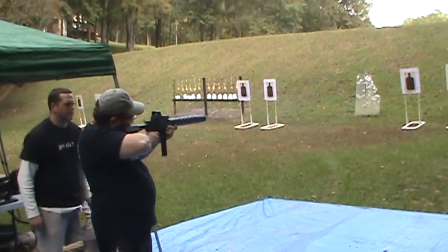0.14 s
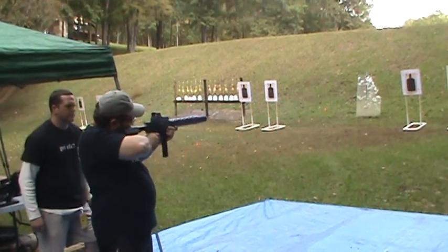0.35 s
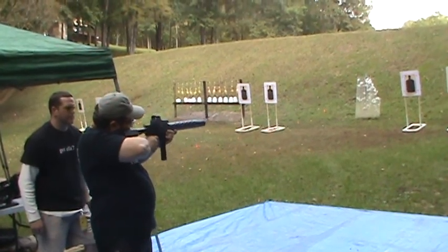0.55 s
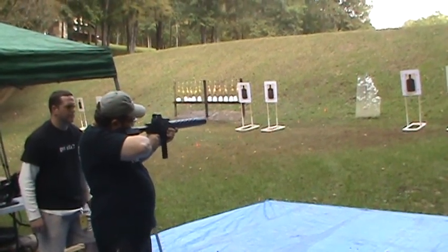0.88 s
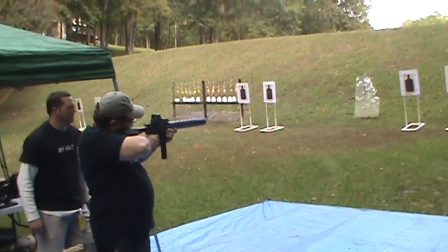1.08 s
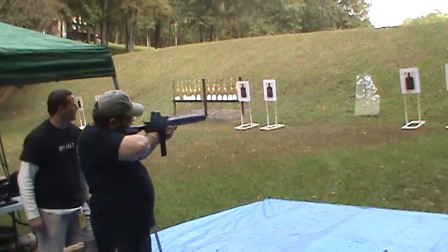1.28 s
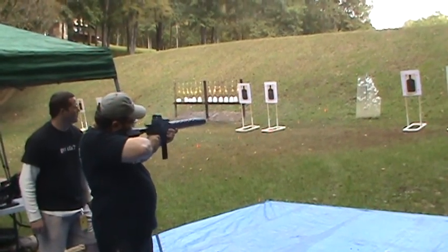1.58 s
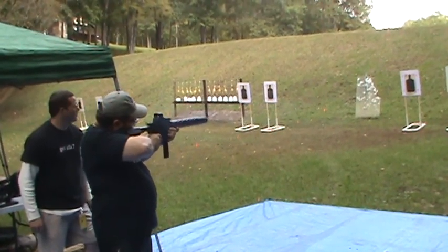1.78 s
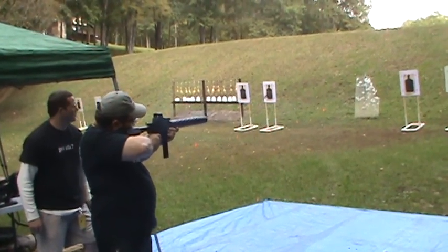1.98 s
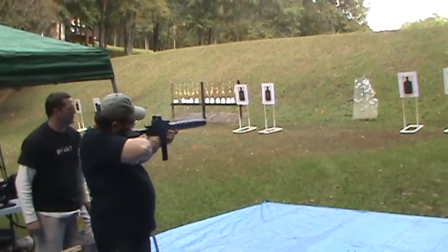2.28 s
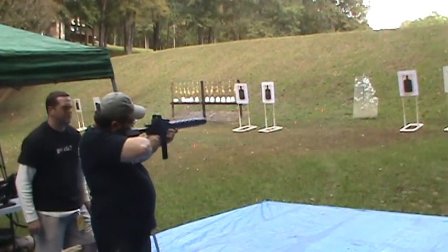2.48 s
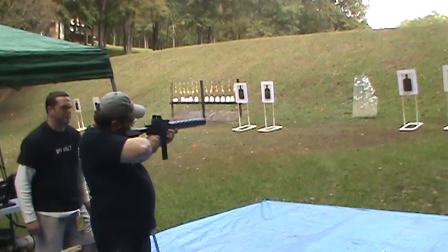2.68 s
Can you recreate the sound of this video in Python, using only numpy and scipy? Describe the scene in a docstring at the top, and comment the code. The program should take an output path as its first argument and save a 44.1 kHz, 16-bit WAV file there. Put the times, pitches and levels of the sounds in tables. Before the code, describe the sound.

A suppressed carbine fires four quick rounds, then three, then four more at an open outdoor range; bullets snap and thud downrange, echoes hiss from trees, and the close microphone's level is squashed flat.

```python
"""The fading hiss of an earlier round opens an outdoor range; a suppressed carbine fires a four-round burst.
Each round is a low damped muzzle thump, a noise puff of gas and a bolt clack; its crack scatters
back from the trees as a long hiss of tiny echoes, and bullets snap on a target and thud into the berm.
A three-round burst follows, then a quieter gun pops, knocks and vents a whistling jet of filtered noise.
A last four-round burst ends with spent cases landing; a fast limiter flattens the bursts throughout."""
import sys
import numpy as np
from scipy import signal
from scipy.fft import rfft, irfft
from scipy.io import wavfile

SR = 44100
rng = np.random.default_rng(int(sys.argv[2]) if len(sys.argv) > 2 else 0)


def wav_record(signal):
    """Record a signal, one row per channel, as 16-bit PCM in the file named by sys.argv[1]."""
    frames = np.transpose(np.atleast_2d(signal))
    bounded = np.clip(frames, -1, 1)
    # unit amplitude maps onto the largest positive 16-bit level
    quanta = np.round(bounded * 32767).astype(np.int16)
    wavfile.write(sys.argv[1], SR, quanta)


N = 125685
TIME = np.arange(N) / SR
# T60 is the time to fall 60 dB; all source levels are relative and lie ahead of the limiter.


def from_db(db):
    """Decibels to gain."""
    return 10 ** (np.asarray(db) / 20)


def rms_one(x):
    """Scale to unit rms."""
    return x / np.sqrt(np.mean(x ** 2) + 1e-20)


def at_hz(points, hz):
    """Read a table along log frequency."""
    points = np.array(points)
    return np.interp(np.log(hz), np.log(points[:, 0]), points[:, 1])


def filtered(x, order, hz, kind):
    """Butterworth filter of the given kind."""
    return signal.sosfilt(signal.butter(order, hz, kind, fs=SR, output="sos"), x)


def drift(rate_hz):
    """Smooth random wander of spread 1: noise through two equal low-pass poles, run at SR / 40."""
    step = 40
    pole = np.exp(-2 * np.pi * rate_hz * step / SR)
    slow = signal.lfilter([1], [1, -2 * pole, pole * pole], rng.standard_normal(N // step + 2002))
    slow = slow[2000:]  # drop the filter's start-up
    return np.interp(np.arange(N) / step, np.arange(len(slow)), rms_one(slow))


def blow(start, t60, rise=1e-4):
    """Envelope that swells from its start and dies away."""
    age = np.maximum(TIME - start, 0)
    return (1 - np.exp(-age / rise)) * np.exp(-np.log(1000) * age / t60)


def ring(start, hz, t60, rise=1e-4):
    """A damped pressure swing."""
    return blow(start, t60, rise) * np.sin(2 * np.pi * hz * (TIME - start))


def pan(db):
    """Left gain up and right gain down by the same decibels."""
    return from_db([[db], [-db]])


def stereo(mid, side, likeness):
    """Left and right from two unrelated signals; likeness is their correlation."""
    c = np.clip(likeness, 0, .999)
    return np.sqrt((1 + c) / 2) * mid + np.sqrt((1 - c) / 2) * side * np.array([[1], [-1]])


NEAR_LIKENESS = 0.94


def noise(colour, likeness=NEAR_LIKENESS):
    """Stereo noise of a given spectrum, rms 1."""
    hz = np.maximum(np.fft.rfftfreq(N, 1 / SR), 1)
    spectra = rfft(rng.standard_normal((2, N))) * from_db(at_hz(colour, hz))
    mid, side = irfft(spectra, N)
    return rms_one(stereo(mid, side, likeness))


TICK_LOW_HZ = 1370


def ticks(rows, t60, colour):
    """Short hard contacts as noise bursts, with no bass."""
    contacts = sum(from_db(db) * blow(s, t60) for s, db in rows) * noise(colour)
    return filtered(contacts, 2, TICK_LOW_HZ, "high")


# colour of the outdoor air: (frequency [Hz], level [dB])
AIR_COLOUR = [(30, -21), (400, -10.5), (1500, -13.5), (6000, -19), (15000, -45)]
AIR_DB = -45


def air():
    """Faint outdoor air: a steady bed of dull noise."""
    return from_db(AIR_DB) * noise(AIR_COLOUR)


# colour of the scatter from trees and berm: (frequency [Hz], level [dB per Hz])
ECHO_COLOUR = [(90, -19.5), (250, -10.5), (500, -18), (850, -10.5), (1100, -14.5), (2000, -6), (3800, -1),
               (7000, -3), (9200, -3), (12000, -9.5), (15500, -17)]
# how long the scatter lasts: (frequency [Hz], T60 [s])
ECHO_T60 = [(70, 1.84), (170, 0.83), (450, 1.83), (2300, 1.9), (5000, 1.173), (9000, 0.78), (15000, 0.38)]
# width of the scatter: (frequency [Hz], left-right likeness [0 to 1])
ECHO_LIKENESS = [(60, 1), (1400, 0.85), (9000, 0.86), (14000, 0.42)]
ECHO_DB, ECHO_RISE_S, POP_ECHO_DB = -11, 0.027, -13.5
ECHOES_PER_S, ECHO_SPREAD_DB = 14000, 2
ECHO_FLICKER_HZ, ECHO_PATCHY_DB = 57.4, 1.0   # patchiness is per unit of drift


def trees():
    """Thousands of tiny echoes of every crack; the later ones have lost their treble in the air."""
    cracks = np.array([(s, db) for s, _, db in SHOTS] + [(POP_S, POP_ECHO_DB)])
    coarse_time = TIME[::20]
    ages = np.maximum(coarse_time - cracks[:, :1], 0)
    swell = from_db(cracks[:, 1:]) * (1 - np.exp(-ages / ECHO_RISE_S))

    shape = (2, 2, N)  # two sets of mid and side, taken by alternate bands
    echoes = rng.standard_normal(shape) * (rng.random(shape) < ECHOES_PER_S / SR)
    echoes = echoes * from_db(ECHO_SPREAD_DB * rng.standard_normal(shape))

    edges = np.geomspace(30, 17000, 28)
    hiss, total_power = 0, 0
    together = drift(ECHO_FLICKER_HZ)  # flicker shared by all bands
    for k, (low, high) in enumerate(zip(edges, edges[1:])):
        hz = np.sqrt(low * high)
        band = filtered(echoes[k % 2], 2, [low, high], "band")
        band = filtered(band, 2, min(1.2 * high, .48 * SR), "low")  # steeper upper skirt
        band = rms_one(stereo(*band, at_hz(ECHO_LIKENESS, hz)))
        fade = np.exp(-np.log(1000) * ages / at_hz(ECHO_T60, hz))
        power = np.sum((swell * fade) ** 2, axis=0)  # the tails of all cracks add as power
        envelope = np.interp(TIME, coarse_time, np.sqrt(power))
        gain = from_db(at_hz(ECHO_COLOUR, hz)) * np.sqrt(high - low)
        patches = from_db(ECHO_PATCHY_DB * (0.29 * together + drift(ECHO_FLICKER_HZ)))
        hiss = hiss + gain * patches * envelope * band
        total_power += gain ** 2
    return from_db(ECHO_DB) * hiss / np.sqrt(total_power)


CRACKLE_PER_S, CRACKLE_DB, CRACKLE_T60_S, CRACKLE_BAND_HZ = 130, 15, 0.74, (1300, 5500)


def crackle():
    """Sparse random crackling spikes over the hiss, fading after each crack."""
    tails = [from_db(db + CRACKLE_DB) * blow(s, CRACKLE_T60_S, ECHO_RISE_S) for s, _, db in SHOTS]
    level = np.max(tails, axis=0)
    spikes = level * (rng.random(N) < CRACKLE_PER_S / SR) * rng.random(N)
    return filtered(spikes + 1e-18, 2, CRACKLE_BAND_HZ, "band")  # the offset is inaudible


# dry slaps from downrange: (time [s], level [dB])
SLAPS = [(.2585, -11), (0.3292, -10), (1.1695, -10.5), (1.318, -8.5), (1.4003, -15), (2.1435, -8.5)]
# their midrange colour: (frequency [Hz], level [dB])
SLAP_COLOUR = [(300, -6), (1500, 2), (3500, 2), (15000, -26)]
SLAP_T60_S = 0.024


def slaps():
    """Dry midrange slaps from downrange, as short noise bursts."""
    return sum(from_db(db) * blow(s, SLAP_T60_S) for s, db in SLAPS) * noise(SLAP_COLOUR)


# bullets hitting earth: (time [s], level [dB], pitch [Hz], decay [cycles to fall 60 dB])
THUDS = [(.180, -1.5, 244, 7.7), (0.256, -11, 325, 6.6), (.33, -13, 363, 6.9), (0.405, -15.5, 380, 10),
         (1.179, -13.5, 355, 7.5), (1.251, -11, 337, 7), (1.3237, -8, 354, 9.2), (1.405, -14.5, 169, 5.5),
         (1.9503, -12, 257, 5.5), (2.147, -10.5, 385, 9.5), (2.216, -9, 355, 8.7), (2.285, -8, 375, 7.6)]
# colour of the thrown dirt: (frequency [Hz], level [dB])
DIRT_COLOUR = [(100, -2), (270, 8.5), (550, -4.5), (1400, -3), (12000, -10)]
THUD_RISE_S, DIRT_DB, DIRT_T60_S = 0.0017, -11, 0.076


def berm():
    """Bullets thud into the earth bank as damped swings and throw up a noise burst of dirt."""
    thud = sum(from_db(db) * ring(s, hz, cycles / hz, THUD_RISE_S) for s, db, hz, cycles in THUDS)
    dirt = sum(from_db(db + DIRT_DB) * blow(s, DIRT_T60_S) for s, db, _, _ in THUDS)
    return thud + dirt * noise(DIRT_COLOUR)


# spent cases landing: (time [s], level [dB])
CASES = [(.9255, -44), (2.5035, -32), (2.5288, -32)]
# their bright colour: (frequency [Hz], level [dB])
CASE_COLOUR = [(2000, -24), (6000, 17), (12000, 11)]
CASE_T60_S = 0.03


def spent_cases():
    """Spent cases land with short bright ticks."""
    return ticks(CASES, CASE_T60_S, CASE_COLOUR)


# the quieter gun's parts knocking together: (time [s], level [dB], T60 [s])
KNOCKS = [(1.8444, -2.5, 0.031), (1.8612, -9.5, 0.071), (1.877, -12.5, 0.041), (1.9189, -5.5, 0.0094)]
# colour of the knocks: (frequency [Hz], level [dB])
KNOCK_COLOUR = [(200, -9), (1100, -2.5), (1800, 3), (2700, 1), (4000, 1), (8600, 1), (15000, -9)]
# ringing modes of its steel: (frequency [Hz], level [dB])
STEEL = [(3994, -26.5), (6293, -25), (6325, -22), (6724, -24), (7407, -23), (10654, -32)]
STEEL_T60_S = 0.28


def clatter():
    """The quieter gun's parts knock together and set its steel ringing."""
    knocks = sum(from_db(db) * blow(s, t60) for s, db, t60 in KNOCKS) * noise(KNOCK_COLOUR)
    steel = sum(from_db(db + mode_db) * ring(s, hz, STEEL_T60_S)
                for s, db, _ in KNOCKS for hz, mode_db in STEEL)
    return knocks + steel


# colour of the pop: (frequency [Hz], level [dB])
POP_COLOUR = [(60, -6), (300, 3), (800, -3), (2700, 5), (5500, -1.5), (6800, 11.5), (9000, -6)]
# colour of gas whistling out of the suppressor: (frequency [Hz], level [dB])
VENT_COLOUR = [(2400, -16.5), (5600, 0), (6500, 8), (7400, -0.5), (9400, -2.5), (10700, 0.5), (15500, -16)]
POP_S, POP_DB, POP_RISE_S, POP_T60_S = 1.8398, 4.5, 0.0087, 0.066
VENT_DB, VENT_RISE_S, VENT_HOLD_S = -11.5, 0.031, 0.0745
VENT_DROP_DB, VENT_T60_S, VENT_PAN_DB = -10.5, 0.54, -1.8


def quiet_gun():
    """A pop, then a whistling jet of gas that holds briefly, drops and dies away."""
    pop = from_db(POP_DB) * blow(POP_S, POP_T60_S, POP_RISE_S) * noise(POP_COLOUR)
    age = np.maximum(TIME - POP_S, 0)
    swell = 1 - np.exp(-age / VENT_RISE_S)
    tail = from_db(VENT_DROP_DB) * blow(POP_S + VENT_HOLD_S, VENT_T60_S)
    pressure = np.where(age < VENT_HOLD_S, 1, tail)
    vent = from_db(VENT_DB) * swell * pressure * noise(VENT_COLOUR)
    return pop + vent * pan(VENT_PAN_DB)


# bullets striking a target: (time [s], snap level [dB], clang level [dB])
STRIKES = [(0.2373, -11, -13), (.3102, -6, -10), (1.1467, 3, -6), (1.2188, -1, -11), (1.2909, 3, -9)]
# colour of the snaps, shared by the reports' leading edges: (frequency [Hz], level [dB])
SNAP_COLOUR = [(1000, 5), (3800, 1), (9000, -8), (16000, -3)]
# colour of the clangs, shared by the bolt: (frequency [Hz], level [dB])
CLANG_COLOUR = [(5500, -14), (7400, 3), (9500, -5), (15000, -26)]
SNAP_T60_S, CLANG_DELAY_S, CLANG_T60_S = 0.004, 0.0037, 0.026


def strikes():
    """Sharp snaps as bullets strike a target, each followed by a short bright clang."""
    snaps = [(s, db) for s, db, _ in STRIKES]
    clangs = [(s + CLANG_DELAY_S, db) for s, _, db in STRIKES]
    return ticks(snaps, SNAP_T60_S, SNAP_COLOUR) + ticks(clangs, CLANG_T60_S, CLANG_COLOUR)


CRACK_DB, CRACK_T60_S = -14.5, 0.0099


def leading_edges():
    """The thin leading edge of each report, a very short noise tick."""
    return ticks([(s, db + CRACK_DB) for s, db, _ in SHOTS], CRACK_T60_S, SNAP_COLOUR)


# rounds, the first faint and already dying away: (time [s], muzzle level [dB], echo level [dB])
SHOTS = [(-.17, -15, -18.5), (0.1359, 0.5, 0), (0.2113, -4, -2.5), (0.286, -4.5, 0), (0.3594, -2.5, 0.5),
         (1.1326, 0, 0.5), (1.2058, -5.5, -6), (1.2798, -7, 1), (2.0284, 0.5, -1), (2.1013, -4.5, -0.5),
         (2.1716, -1.5, -1), (2.2424, -3.5, 1)]
# the muzzle's pressure swing: (frequency [Hz], level [dB], T60 [s])
THUMP = [(117, -8.5, 0.029), (159, -17, 0.079), (652, -20, 0.042), (1110, -20, 0.014)]
# colour of the rumble off the ground: (frequency [Hz], level [dB])
RUMBLE_COLOUR = [(30, -26), (100, -7), (250, -2), (500, -4), (1500, -3), (8000, -43)]
# colour of the gas puff: (frequency [Hz], level [dB])
PUFF_COLOUR = [(300, 7.5), (1100, 9), (5000, -12.5), (9000, 5.5), (15000, -14.5)]
THUMP_RISE_S, THUMP_PAN_DB = 0.00085, 1.2
RUMBLE_DB, RUMBLE_RISE_S, RUMBLE_T60_S, RUMBLE_LIKENESS = -28.5, 0.0052, 0.2, 0.71
PUFF_DB, PUFF_RISE_S, PUFF_T60_S = -10.5, 0.0044, 0.05
BOLT_DB, BOLT_DELAY_S, BOLT_RISE_S, BOLT_T60_S = -25.5, 0.013, 0.0033, 0.11


def carbine():
    """Muzzle thump, its rumble off the ground, a puff of gas and the bolt's clack for each round."""
    thump = sum(from_db(db + mode_db) * ring(s, hz, t60, THUMP_RISE_S)
                for s, db, _ in SHOTS for hz, mode_db, t60 in THUMP)
    rumble = sum(from_db(db + RUMBLE_DB) * blow(s, RUMBLE_T60_S, RUMBLE_RISE_S) for s, db, _ in SHOTS)
    puff = sum(from_db(db + PUFF_DB) * blow(s, PUFF_T60_S, PUFF_RISE_S) for s, db, _ in SHOTS)
    # the bolt is equally loud on every round
    bolt = sum(from_db(BOLT_DB) * blow(s + BOLT_DELAY_S, BOLT_T60_S, BOLT_RISE_S) for s, _, _ in SHOTS)
    low_end = thump * pan(THUMP_PAN_DB) + rumble * noise(RUMBLE_COLOUR, RUMBLE_LIKENESS)
    return low_end + puff * noise(PUFF_COLOUR) + bolt * noise(CLANG_COLOUR)


def scene():
    """Guns, impacts and echoes over faint outdoor air."""
    surroundings = air() + trees() + crackle()
    impacts = slaps() + berm() + spent_cases() + strikes()
    quieter_gun = clatter() + quiet_gun()
    return surroundings + impacts + quieter_gun + leading_edges() + carbine()


LOW_CUT_HZ, CUTOFF_HZ = 81, 15850
DETECTOR_LOW_HZ = 200   # the limiter is less sensitive below this
LIMIT_DB, LIMIT_SLOPE = -15.5, 0.91   # slope: dB of cut per dB over the limit
LIMIT_WINDOW_S, LOOK_AHEAD_S = 0.0041, 0.00095
RELEASE_DB_PER_S = 137   # fall of the held level


def record(dry):
    """The deepest bass is cut, a fast limiter holds the bursts level; peaks are rounded and the top is cut."""
    dry = filtered(dry, 2, LOW_CUT_HZ, "high")
    sensed = filtered(dry, 1, DETECTOR_LOW_HZ, "high")
    pole = np.exp(-1 / (LIMIT_WINDOW_S * SR))
    power = signal.lfilter([1 - pole], [1, -pole], np.mean(sensed ** 2, axis=0))
    level_db = 10 * np.log10(power + 1e-12)
    # hold each peak, letting it fall at the release rate
    release_db = RELEASE_DB_PER_S * TIME
    held_db = np.maximum.accumulate(level_db + release_db) - release_db
    held_db = np.interp(TIME + LOOK_AHEAD_S, TIME, held_db)
    cut_db = LIMIT_SLOPE * np.maximum(held_db - LIMIT_DB, 0)
    limited = np.tanh(dry * from_db(-cut_db))
    return signal.sosfilt(signal.ellip(12, .2, 70, CUTOFF_HZ, fs=SR, output="sos"), limited)


dry = scene()
out = record(dry)
wav_record(out)
```